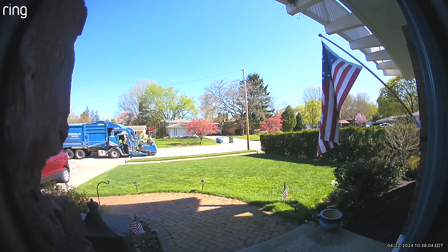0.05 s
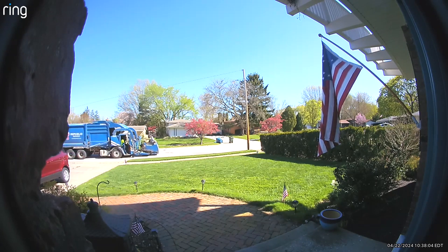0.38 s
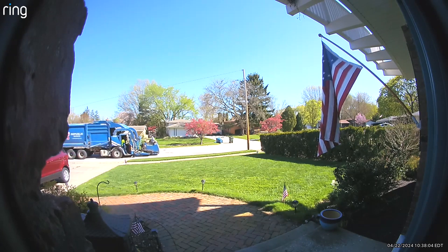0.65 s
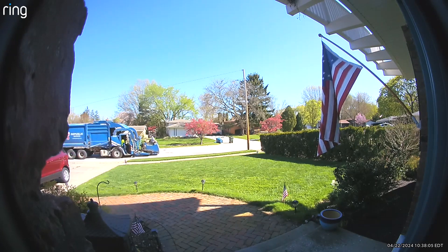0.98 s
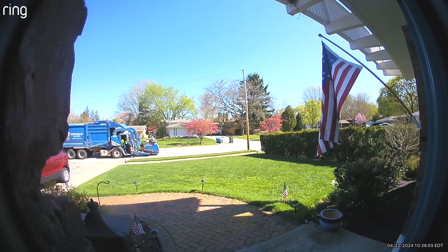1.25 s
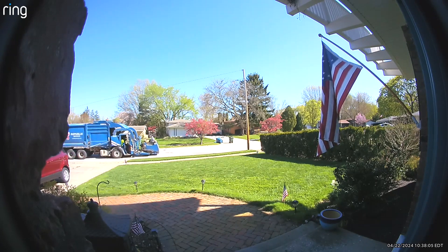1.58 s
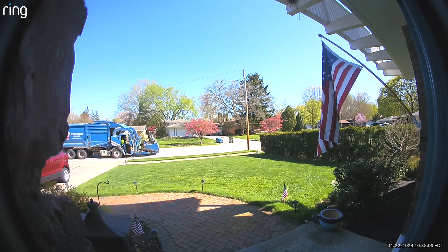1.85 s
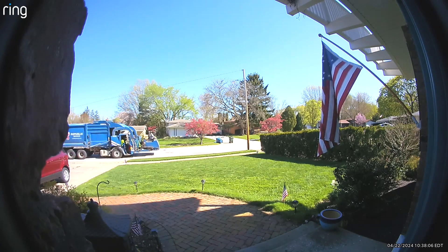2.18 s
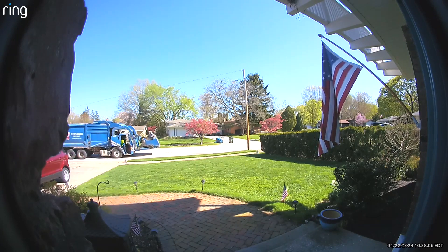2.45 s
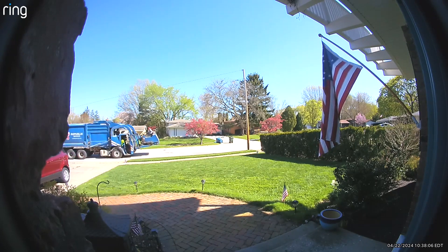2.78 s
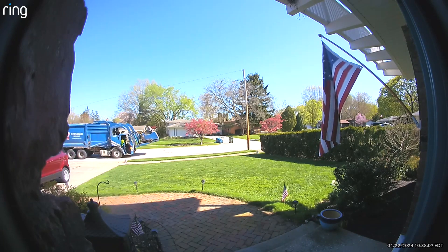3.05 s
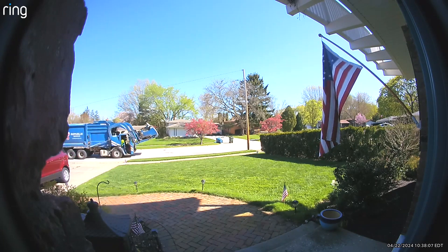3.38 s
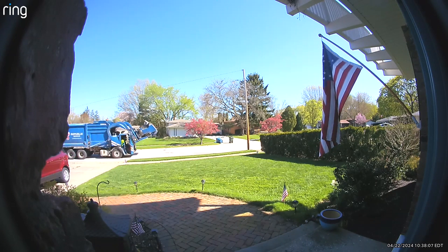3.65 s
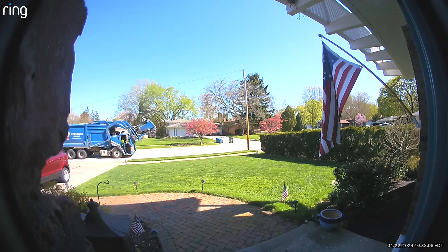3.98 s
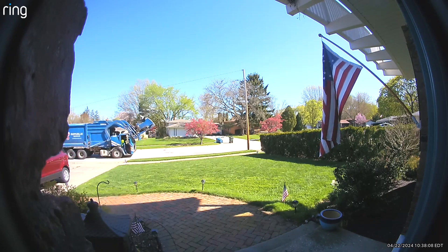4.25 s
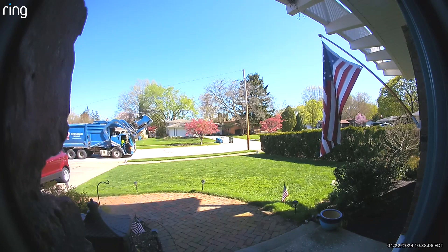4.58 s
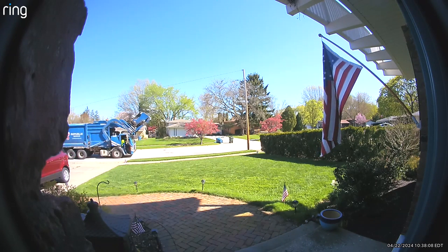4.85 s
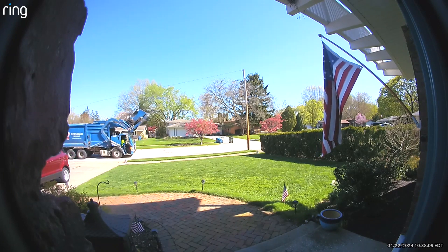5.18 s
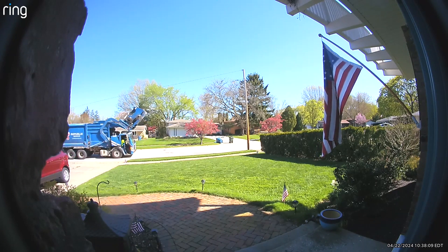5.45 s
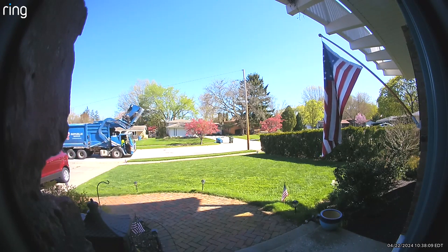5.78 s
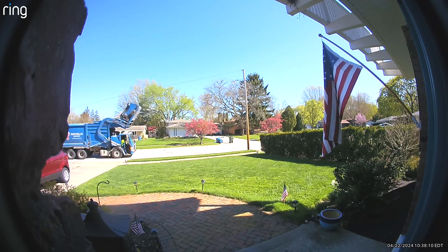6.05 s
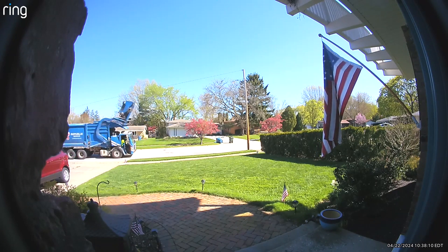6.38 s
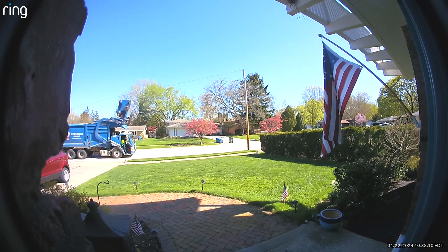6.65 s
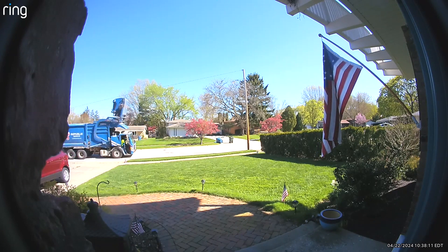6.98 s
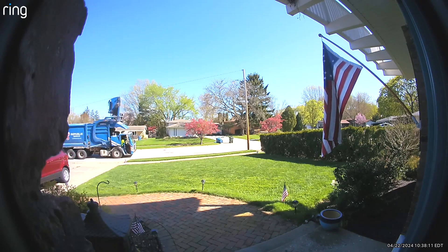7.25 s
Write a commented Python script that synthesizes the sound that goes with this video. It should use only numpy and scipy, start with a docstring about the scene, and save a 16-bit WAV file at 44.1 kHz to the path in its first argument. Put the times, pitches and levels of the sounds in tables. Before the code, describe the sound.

Across a lawn, an air brake hisses, a truck engine revs as its arm whines and squeaks, then a bin clatters against steel.

```python
"""A garbage truck across a front lawn, heard from a porch through a door camera's small microphone.
A far bird chirps over the idling diesel, then the air brake lets off a long jet of compressed air.
The engine revs up to drive the hydraulic arm: the pump hums, pivots squeak, the hollow body thumps.
The load eases, a plastic bin is knocked empty against the steel hopper, and the houses throw the bangs
back. A small valve spits a short puff of air near the end."""
import sys
import numpy as np
from scipy import signal
from scipy.fft import rfft, irfft, next_fast_len
from scipy.io import wavfile
from scipy.ndimage import uniform_filter1d

SR = 44100
rng = np.random.default_rng(int(sys.argv[2]) if len(sys.argv) > 2 else 0)


def generate_wav(signal):
    """Clip the signal to [-1, 1] and save it as 16-bit WAV at the path in sys.argv[1]."""
    frames = np.transpose(np.atleast_2d(signal))
    scaled = np.clip(frames, -1, 1) * 32767
    pcm = np.round(scaled).astype(np.int16)
    wavfile.write(sys.argv[1], SR, pcm)


N = 327432
TIME = np.arange(N) / SR
HZ = np.fft.rfftfreq(N, 1 / SR)
LIFT_S, LOWER_S = 2.72, 5.64  # the arm loads the engine between these times
GRAB_S, EASE_S = 0.07, 0.072  # how long the load takes to come and to go


def amp(db):
    """Decibels to gain."""
    return 10 ** (np.asarray(db) / 20)


def unit(x):
    """Scales to rms 1."""
    return x / np.sqrt(np.mean(x ** 2) + 1e-20)


def unit_burst(x):
    """Scales the loudest 20 ms to rms 1."""
    return x / np.sqrt(uniform_filter1d(x ** 2, size=882).max())


def ramp(start_s, length_s):
    """Goes from 0 to 1 in the given time, then stays."""
    return np.clip((TIME - start_s) / length_s, 0, 1)


def curve(rows):
    """A table of times and values, at every sample."""
    return np.interp(TIME, *np.transpose(rows))


def read(points, hz):
    """Reads a table of frequencies and values on a log-frequency axis."""
    freqs, values = np.transpose(points)
    return np.interp(np.log(hz + 1), np.log(freqs), values)


def add(mix, start_s, sound):
    """Mixes a sound in at the given time."""
    part = mix[max(round(start_s * SR), 0):][:len(sound)]
    part += sound[:len(part)]


def drift(rate_hz):
    """A slow random wander of rms 1."""
    return unit(irfft(rfft(rng.standard_normal(N)) / (1 + (HZ / rate_hz) ** 4), N))


def ripple(hz, width_hz):
    """Random peaks and dips along frequency, rms 1, none far above the rest."""
    grid = np.arange(0, SR / 2, 5)
    bump = np.exp(-2 * (np.arange(-200, 201) * 5 / width_hz) ** 2)
    field = signal.fftconvolve(rng.standard_normal(len(grid)), bump, "same")
    return np.interp(hz, grid, unit(np.tanh(unit(field) / 2)))


def colour(x, spectrum, peaks=(), ripple_db=0, ripple_hz=50):
    """Shapes x by a broad spectrum, listed peaks and notches, and many small random ones; rms 1."""
    size = next_fast_len(len(x))
    hz = np.fft.rfftfreq(size, 1 / SR)
    peaks_db = sum(lift / (1 + (2 * (hz - centre) / width) ** 2) for centre, width, lift in peaks)
    db = read(spectrum, hz) + peaks_db + ripple_db * ripple(hz, ripple_hz)
    return unit(irfft(rfft(x, size) * amp(db), size)[:len(x)])


def churn(x, depth_db):
    """Narrow bands swell and fade on their own for some tens of milliseconds; rms 1."""
    bands = signal.stft(x, SR, nperseg=1024, noverlap=768)[2]
    patches = uniform_filter1d(rng.standard_normal(bands.shape), size=3, axis=0)
    patches = unit(uniform_filter1d(patches, size=8, axis=1))
    return unit(signal.istft(bands * amp(depth_db * patches), SR, nperseg=1024, noverlap=768)[1][:N])


def street(level_db=-66):
    """The quiet wash of the street, as it reaches the porch."""
    # street noise: freq_hz, relative_db
    spectrum = [(30, -7.5), (150, -10), (550, 2.5), (1000, -3.5), (1700, -10), (2500, -2.5), (3200, -13),
                (3900, -7.5), (4600, -18.5), (7000, -26.5), (7800, -41), (9000, -48)]
    wash = colour(rng.standard_normal(N), spectrum, ripple_db=1.5, ripple_hz=60)
    return amp(level_db) * churn(wash, depth_db=2.2)


def bird(length_s=0.058, fall=0.062, blur=0.18):
    """A far bird: short falling notes, blurred by distance."""
    # notes: start_s, level_db, pitch_hz
    chirps = [(.07, -69, 3880), (.14, -77, 3920), (.3, -65, 3860), (.41, -74, 3900), (.66, -65, 3820)]
    out, progress = np.zeros(N), np.linspace(0, 1, int(length_s * SR))
    for start_s, db, hz in chirps:
        pitch = hz * (1 + fall * (.5 - progress) + blur * rng.standard_normal(len(progress)))
        note = np.sin(2 * np.pi * np.cumsum(pitch) / SR)
        add(out, start_s, amp(db) * np.sin(np.pi * progress) * note)
    return out


def facades(x, dull_hz=3500):
    """House fronts throw each bang back, late and duller."""
    # single reflections: delay_s, gain_db
    echoes = [(.123, -19), (.175, -31)]
    out = x.copy()
    dull = signal.sosfilt(signal.butter(1, dull_hz, fs=SR, output="sos"), x)
    for delay_s, db in echoes:
        add(out, delay_s, amp(db) * dull)
    return out


def street_echo(x, echo_db=-20, crossing_s=0.083):
    """Houses and trees scatter a tail of echoes, strongest after the trip across the street."""
    # decay of the tail: freq_hz, t60_s
    decay = [(100, 0.91), (700, 0.56), (2000, 1), (5000, 0.39), (8000, 0.1)]
    taps = rng.standard_normal(SR) * (rng.random(SR) < 2000 / SR)
    hz, t, bands = signal.stft(taps, SR, nperseg=256)
    envelope = np.minimum(t / crossing_s, 1) ** 2 * amp(-60 * t / read(decay, hz)[:, None])
    tail = signal.istft(bands * envelope, SR, nperseg=256)[1]
    return x + amp(echo_db) * signal.fftconvolve(x, tail / np.linalg.norm(tail))[:N]


def engine_cycles(hunt=.015):
    """Count of four-stroke cycles so far; the speed hunts a little."""
    # engine speed: time_s, cycles_per_s
    speed = [(0, 5.9), (1.2, 5.8), (1.8, 8.44), (2.75, 8.24), (3.15, 9.82), (5.55, 10.35), (5.9, 8),
             (7.42, 8.1)]
    return np.cumsum(curve(speed) * (1 + hunt * drift(5))) / SR


def arm_load():
    """Share of the hydraulic load on the engine, 0 to 1."""
    return ramp(LIFT_S, GRAB_S) * (1 - ramp(LOWER_S, EASE_S))


def diesel(rise_cycles=0.068, decay_cycles=0.28, uneven_db=1.5, lumpy_db=2, surge_hz=4.28):
    """Six uneven cylinders: each firing puffs the exhaust and rattles its own part of the block."""
    # strength of each firing: relative_db
    cylinders = [-6.5, -5, -5, -5.5, -6.5, -5]
    # engine effort from revving up to easing off: time_s, level_db
    effort = [(2.02, -57), (2.14, -57), (3.1, -39.5), (3.63, -37), (4.82, -37.5), (5.5, -36), (5.57, -35.5),
              (5.77, -52.5), (5.85, -50)]
    # narrow rumble at idle: freq_hz, relative_db
    idle_spectrum = [(25, -36), (60, -19.5), (120, -11.5), (200, -7), (255, 5.5), (300, -12), (380, -19),
                     (480, -26), (800, -53), (4000, -88.5)]
    # wider rumble under load: freq_hz, relative_db
    work_spectrum = [(25, -27.5), (45, -31.5), (65, -13), (105, -6), (128, -10.5), (165, 0), (260, 3),
                     (325, 3.5), (355, -7.5), (440, -6.5), (490, -14.5), (800, -67), (4000, -82.5)]
    # clatter of the block: freq_hz, relative_db
    block_spectrum = [(200, -22), (450, -8), (600, 1.5), (850, -2), (1050, 2), (1280, -4.5), (1550, -6),
                      (2100, -10), (2650, -7), (3000, -15), (3900, -20.5), (5100, -22), (7050, -20),
                      (7600, -54), (9000, -63.5)]
    # ringing panels of the truck: centre_hz, width_hz, lift_db
    panels = [(1030, 97, 3), (1283, 29, 5), (2250, 370, 3.5), (3364, 170, 7), (3480, 90, 4.5),
              (4460, 380, 10)]
    effort_db = curve([(1.0, -66.5), *effort])  # steady idle for the first second
    cycles = engine_cycles()
    firings = cycles * len(cylinders)
    puff_gain = np.take(amp(cylinders), firings.astype(int), mode="wrap")
    puffs = puff_gain * (.5 + np.exp(-(firings % 1) / 0.2)) * rng.standard_normal(N)
    clatter = 0
    for k, db in enumerate(cylinders):
        own_cycles = cycles + 1 - k / len(cylinders)
        phase = own_cycles % 1
        strength = amp(uneven_db * rng.standard_normal(N)[own_cycles.astype(int)])
        envelope = (1 - np.exp(-phase / rise_cycles)) * np.exp(-phase / decay_cycles)
        knocks = strength * envelope * rng.standard_normal(N)
        clatter += amp(db) * colour(knocks, block_spectrum, panels, ripple_db=5, ripple_hz=67.5)
    clatter = amp(effort_db - 1) * churn(clatter, depth_db=2.6)
    # the exhaust surges more as the bin goes up
    surge_db = 2.5 * ramp(LIFT_S, LOWER_S - LIFT_S) * np.cos(2 * np.pi * surge_hz * (TIME - 4.96))
    working = np.maximum(arm_load(), amp(-8)) * amp(effort_db + 2 + surge_db)
    coasting = ramp(LOWER_S, EASE_S) * amp(-59)
    idle_rumble = (amp(-63) + coasting) * colour(rng.standard_normal(N), idle_spectrum)
    work_rumble = (working + coasting) * colour(puffs, work_spectrum)
    return (idle_rumble + work_rumble) * amp(lumpy_db * drift(8)) + clatter


def pump(hum_hz=312, level_db=-36, waver=0.00802, flutter_db=4, light_db=-9.5, relaxed_db=-18):
    """The hydraulic hum swells as the arm takes the weight, and drops back when the bin is up."""
    # tones of the pump: multiple_of_hum, relative_db
    orders = [(1 / 3, -13.5), (0.99, 0), (1.81, -13), (2.5, -17.5), (3.97, -12.5)]
    weight = ramp(3.48, 0.44)
    gain = arm_load() * amp(light_db * (1 - weight)) + ramp(LOWER_S, EASE_S) * amp(relaxed_db)
    tones = 0
    for order, db in orders:
        turns = order * np.cumsum(hum_hz * (1 + waver * drift(14.43))) / SR
        tones += amp(db) * unit(amp(flutter_db * drift(14.6)) * np.sin(2 * np.pi * turns))
    return amp(level_db) * gain * tones


def squeaks(chatter_db=1.8, throb=.75):
    """Dry pivots and strained valves sing in narrow bands that throb at engine rate, more under load."""
    # squeaks of the arm: start_s, length_s, pitch_hz, width_hz, level_db
    rubs = [(1.72, .12, 4380, 240, -60), (1.82, .18, 1060, 120, -55), (1.85, .09, 4600, 380, -53),
            (2.02, .62, 4730, 170, -57.5), (2.08, .44, 2330, 200, -59), (2.17, .32, 1060, 100, -57),
            (2.555, 1.33, 2245, 85, -48), (2.67, .34, 4740, 170, -57), (3.09, .64, 4620, 100, -55),
            (3.5, 1.2, 3510, 70, -55.5), (4.37, .14, 4570, 120, -53), (5.13, .38, 4520, 90, -55),
            (6.69, .045, 5280, 160, -44), (7.17, .24, 1680, 30, -57)]
    out, freqs = np.zeros(N), np.fft.rfftfreq(2 * SR, 1 / SR)
    cycles, strain = engine_cycles(), arm_load()
    for start_s, length_s, hz, width_hz, db in rubs:
        first = int(start_s * SR)
        span = slice(first, first + int(length_s * SR))
        turns = cycles[span] - cycles[first]
        band = 1 / (1 + ((freqs - hz) / width_hz) ** 2) ** 2
        rub = irfft(rfft(rng.standard_normal(2 * SR)) * band)[:len(turns)]
        shake = (1 - throb * np.cos(2 * np.pi * turns)) ** (.5 + strain[span])
        add(out, start_s, amp(db) * unit(rub * shake) * signal.windows.tukey(len(rub), .3))
    return out * unit(amp(chatter_db * drift(25)))


def body_thumps(swell_s=0.017):
    """The hollow truck body swells and dies on one low note at each thump."""
    # thumps: start_s, level_db, pitch_hz
    thumps = [(.92, -48.5, 366), (1.69, -46, 249.4), (2.052, -40, 250), (2.285, -47.5, 235),
              (2.352, -40, 245), (2.596, -41, 248), (3.215, -27, 281), (7.247, -39.5, 258)]
    out, t = np.zeros(N), np.arange(SR // 4) / SR
    envelope = (t / swell_s * np.exp(1 - t / swell_s)) ** 2
    for start_s, db, hz in thumps:
        add(out, start_s, amp(db) * envelope * np.sin(2 * np.pi * hz * t))
    return out


def air_jet(spectrum, start_s, attack_s, hold_s, release_s, bend, level_db, sputter_db,
            porch_colouring=(), surge_db=0, sag_db_per_s=0):
    """Turbulent compressed air: a valve opens, then the pressure runs out, 20 dB down in release_s."""
    open_s = TIME - start_s - attack_s
    opening_db = -52 * (1 - ramp(start_s, attack_s)) ** 2
    swing_db = surge_db * np.cos(2 * np.pi * (open_s - 0.074) / 0.29)  # the flow surges every 0.29 s
    sag_db = sag_db_per_s * np.clip(open_s, 0, hold_s)
    fall_db = 20 * (np.maximum(open_s - hold_s, 0) / release_s) ** bend
    envelope_db = level_db + opening_db + swing_db - sag_db - fall_db
    hiss = colour(rng.standard_normal(N), spectrum, porch_colouring, ripple_db=1.4, ripple_hz=25)
    hiss = churn(hiss, depth_db=1.2)
    return (TIME > start_s) * amp(envelope_db + sputter_db * drift(60)) * hiss


def air_valve():
    """A small valve spits a short puff of air."""
    # hiss of the valve: freq_hz, relative_db
    spectrum = [(500, -24), (1400, -17), (2000, -14), (2300, -5), (2750, -9.5), (2930, -14), (3400, -2),
                (4400, -2.5), (5800, -3.5), (7100, -9.5), (7600, -27), (8800, -41)]
    return air_jet(spectrum, start_s=6.987, attack_s=.036, hold_s=.004, release_s=.115, bend=.9,
                   level_db=-28, sputter_db=.6)


def air_brake():
    """The brake vents a long blast of air, coloured by the porch."""
    # hiss of the brake: freq_hz, relative_db
    spectrum = [(100, -37.5), (300, -25), (800, -18.5), (1050, -5.5), (1330, -7.5), (1500, -7.5),
                (2000, -2), (2550, -1), (2930, -2.5), (3200, -0.5), (4400, 2), (5700, 2), (7300, -8.5),
                (7800, -29), (9000, -36.5)]
    # peaks and notches that nearby porch reflections put on the hiss: centre_hz, width_hz, lift_db
    porch_colouring = [(551, 46, 14.5), (613, 13, -15.5), (676, 48, 6), (1145, 61, 6), (1300, 15, 10.5),
                       (1530, 72, -6.5), (1660, 50, 2.5), (2235, 61, 10.5), (2374, 88, -1.5),
                       (2520, 51, 5.5), (2990, 71, -4.5), (3390, 16, 7), (3140, 40, 8), (3750, 150, -3),
                       (4060, 20, 6), (4290, 36, 7), (4460, 30, 4.5), (4800, 20, 2.5), (5180, 130, -4.5),
                       (5400, 51, 3.5)]
    return air_jet(spectrum, start_s=.89, attack_s=.095, hold_s=.41, release_s=.25, bend=1.67,
                   level_db=-19, sputter_db=.62, porch_colouring=porch_colouring,
                   surge_db=1.1, sag_db_per_s=4)


def bin_blows(rise_s=0.0099, boom_s=0.01, clang_s=0.057, clang_db=-9, grit_db=1):
    """Each blow is a dying rattle of contacts that rings the bin, clashes on steel, booms the hopper."""
    # blows of bin and arm: start_s, plastic_db, steel_db, boom_db, rattle_s
    blows = [(.566, -80, -54, -73, 0.013), (5.885, -30, -34.5, -54, 0.031), (5.894, -27, -37, -52, 0.01),
             (5.914, -22.5, -30.5, -39, 0.056), (5.952, -22.5, -26, -41, 0.02),
             (6.075, -39.5, -45.5, -54, 0.013), (6.128, -40, -45, -52, 0.016),
             (6.483, -35, -36, -52, 0.064), (6.518, -31, -35.5, -41, 0.064),
             (6.571, -23, -23.5, -31.5, 0.011), (6.583, -23.5, -27, -33.5, 0.016),
             (6.623, -27.5, -41.5, -47, 0.015), (6.81, -51, -47, -62, .05), (6.86, -41, -39.5, -61, 0.023),
             (6.905, -35, -57, -50, 0.049)]
    # modes of the plastic bin: pitch_hz, relative_db, t60_s
    modes = [(380.6, -7.5, 0.14), (505.4, -2.5, 0.098), (526, -1, 0.14), (585.7, -2, 0.083), (625, 0, 0.14),
             (687, 4, 0.067), (701.4, -6.5, 0.18), (769.6, -7, 0.16), (876, -13, 0.22), (960, -16, 0.23),
             (1089, -7, 0.21)]
    # struck steel: freq_hz, relative_db
    steel_spectrum = [(60, -33), (300, -13), (800, 1), (1200, -1.5), (1600, -5.5), (2100, -4), (2550, -7),
                      (3000, -7), (3500, -1.5), (4000, -3), (4550, 2.5), (5600, -2), (7100, -14),
                      (7700, -32), (8800, -43)]
    # low boom of the hopper: freq_hz, relative_db
    boom_spectrum = [(30, -22), (65, 0.5), (105, -1.5), (180, 10.5), (260, 1.5), (330, -4), (500, -48),
                     (1500, -68)]
    out, t = np.zeros(N), np.arange(SR // 2) / SR
    walls = signal.butter(2, [350, 1150], "band", fs=SR, output="sos")  # thin plastic radiates the mids
    onset = (1 - np.exp(-t / rise_s)) ** 2
    for start_s, plastic_db, steel_db, boom_db, rattle_s in blows:
        contacts, grit, hopper_noise, panel_noise = rng.standard_normal((4, len(t)))
        dying = np.exp(-t / rattle_s)
        force = onset * dying
        ring = 0
        for hz, db, t60 in modes:
            turns = hz * rng.uniform(0.95, 1.015) * t + rng.random()
            ring += amp(db - 60 * t / t60) * np.sin(2 * np.pi * turns)
        plastic = signal.sosfilt(walls, signal.fftconvolve(contacts * force * dying, ring)[:len(t)])
        clash = colour(contacts * amp(-grit_db * grit), steel_spectrum, ripple_db=4.5, ripple_hz=120)
        panel = colour(panel_noise, steel_spectrum, ripple_db=13.5, ripple_hz=35)
        clang = panel * onset * np.exp(-t / clang_s)  # a few panel modes ring on
        steel = unit_burst(clash * force) + amp(clang_db) * unit_burst(clang)
        boom = colour(hopper_noise, boom_spectrum) * t * np.exp(-t / boom_s)
        blow = amp(plastic_db) * unit_burst(plastic) + amp(steel_db) * steel
        add(out, start_s, blow + amp(boom_db) * unit_burst(boom))
    return out


def scene():
    """The truck a lawn away over the quiet street, in mono; its knocks echo off the houses."""
    background = street() + bird()
    truck = diesel() + pump() + squeaks() + air_brake() + air_valve()
    knocks = street_echo(facades(bin_blows() + body_thumps()))
    return (background + truck + knocks)[None]


def record(dry):
    """The small microphone on the porch loses the treble above 9.1 kHz."""
    lowpass = signal.firwin(401, 9100, window=("kaiser", 9), fs=SR)
    return signal.oaconvolve(dry, lowpass[None], "same")


dry = scene()
out = record(dry)
generate_wav(out)
```